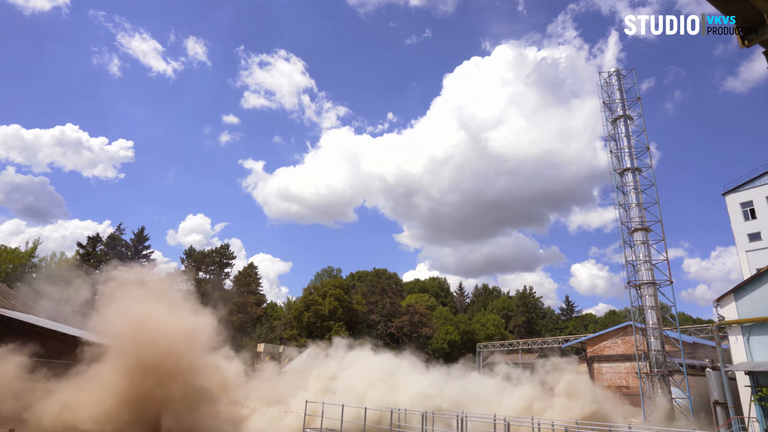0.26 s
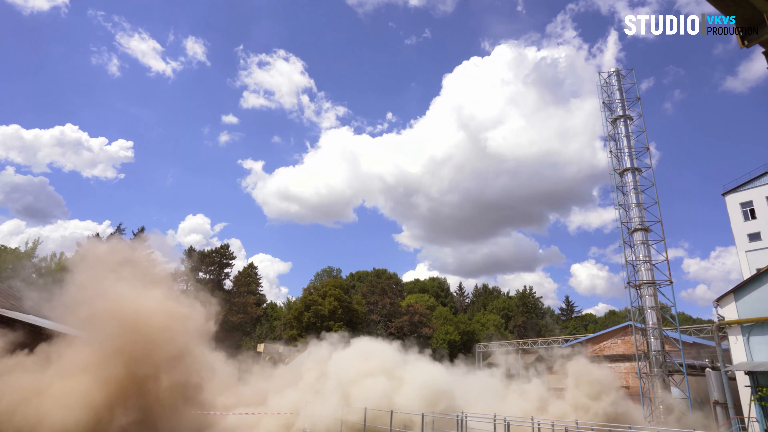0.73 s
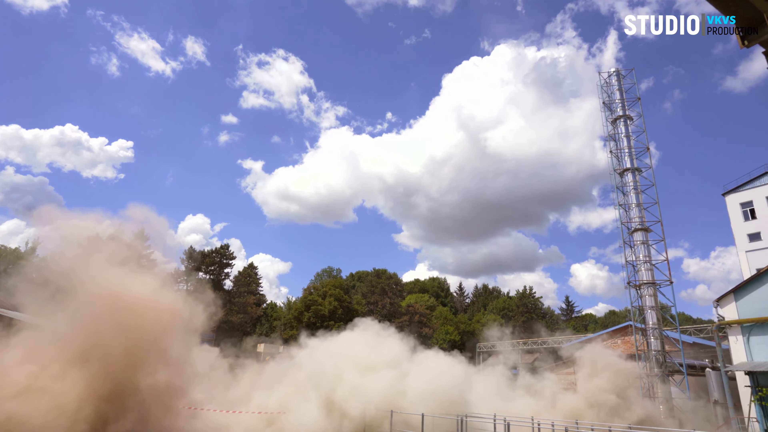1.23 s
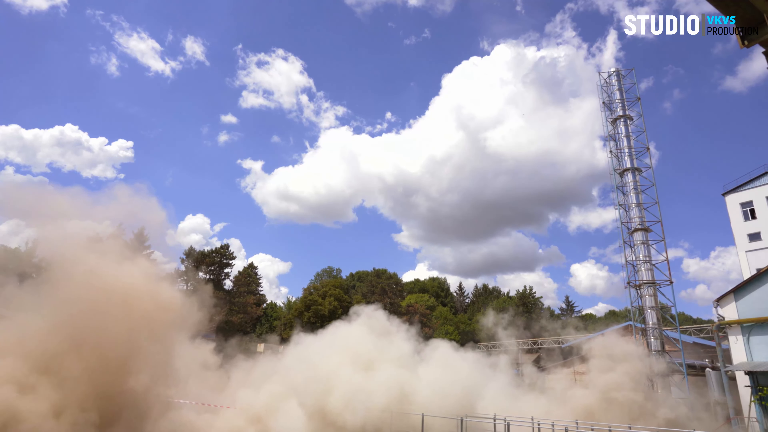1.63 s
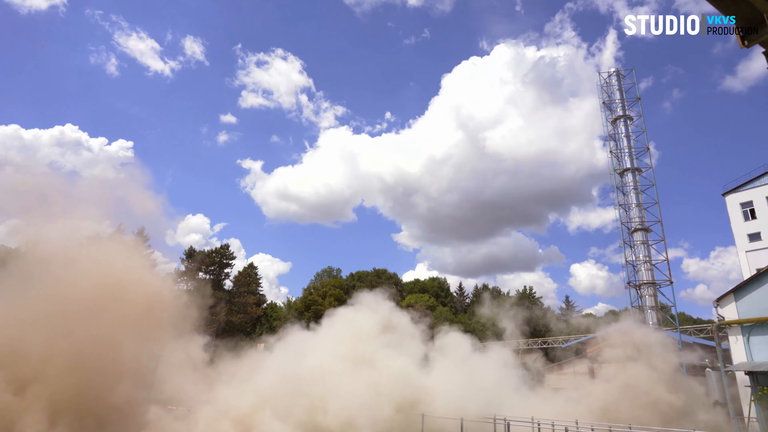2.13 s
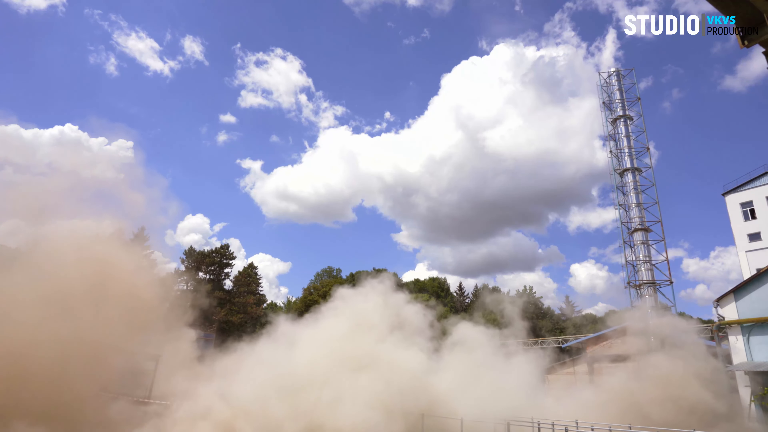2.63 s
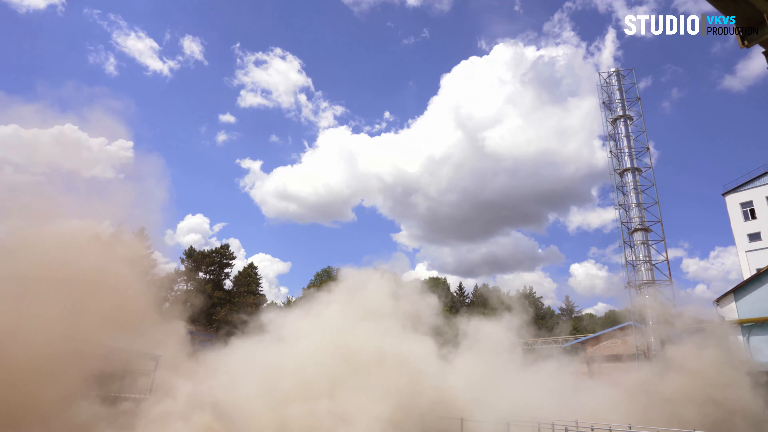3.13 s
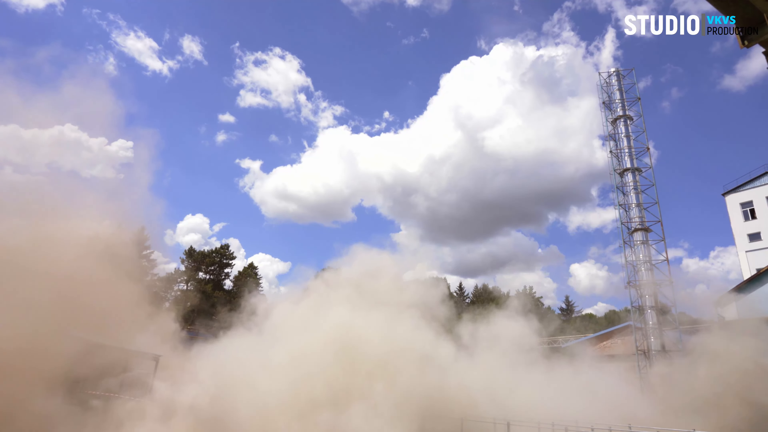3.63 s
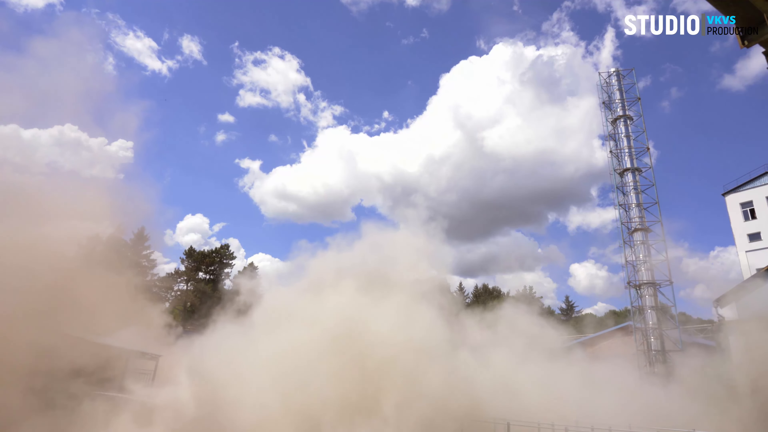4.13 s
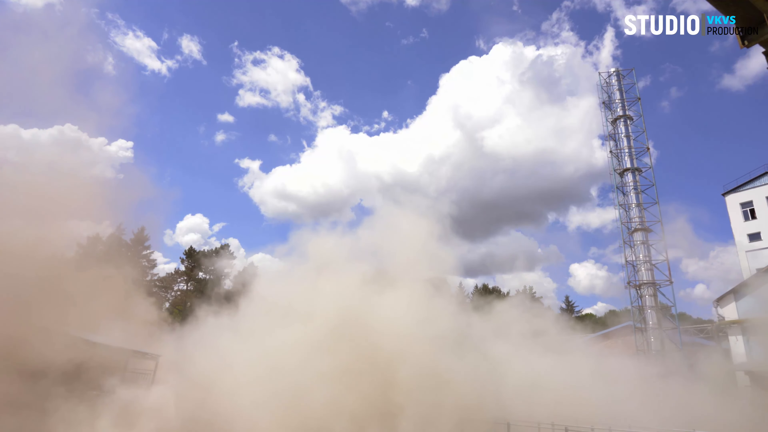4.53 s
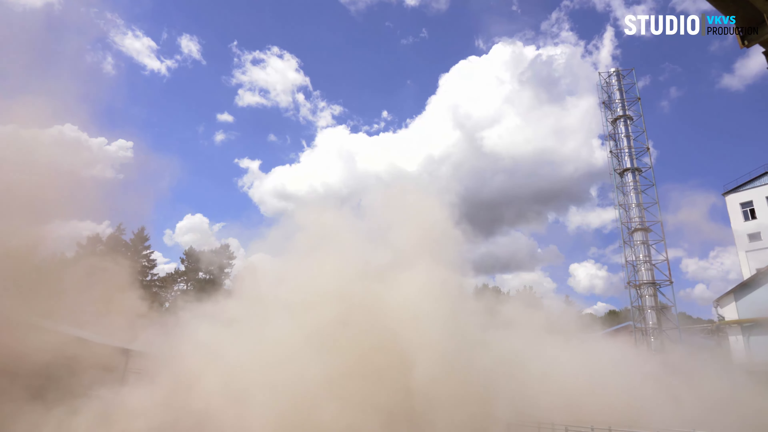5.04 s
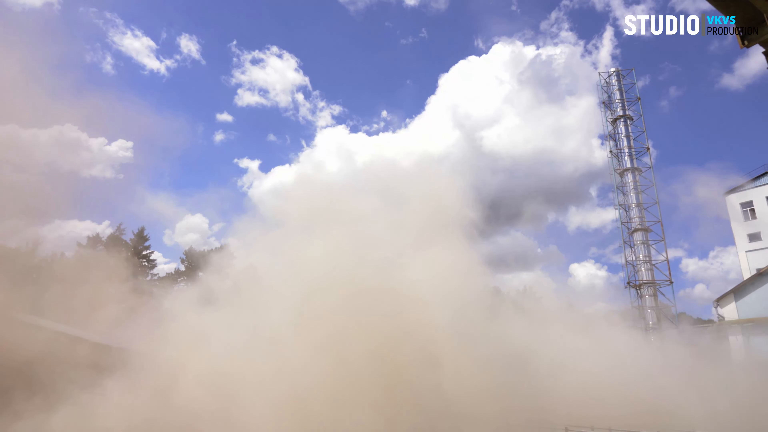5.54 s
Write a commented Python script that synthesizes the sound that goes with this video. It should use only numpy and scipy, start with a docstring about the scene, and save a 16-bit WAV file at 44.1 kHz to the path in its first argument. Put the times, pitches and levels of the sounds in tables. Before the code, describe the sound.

Outdoors beside a collapsed building, masonry falls with a deep rumble, crashing and rattling, uneven at first, then thinning until it stops abruptly at about three seconds. A dull, steady hiss of rolling dust lies beneath and remains, swelling in one throaty gust. Sparse grit ticks close to the microphone, with a few dry clicks and faint low thumps. Mono, no obvious echo, extreme treble missing.

```python
"""Outdoors beside a building that has just come down: masonry keeps falling with a deep rumble that thins and stops short.
The rumble, crash and rattle are random blows mixed with patchy noise in coloured bands; fine debris fizzes on top.
The dust cloud is a dull hiss with a throaty roar and a low roll, lifted by one gust, and it remains after the stop.
Grit ticks near the microphone as short bursts of band noise, among dry clicks and soft low thumps."""
import sys
import numpy as np
from scipy import signal
from scipy.fft import rfft, irfft, next_fast_len
from scipy.io import wavfile
from scipy.ndimage import uniform_filter1d, map_coordinates

SR = 44100
rng = np.random.default_rng(int(sys.argv[2]) if len(sys.argv) > 2 else 0)


def to_wav(s):
    """Save 16-bit WAV."""
    ch = np.atleast_2d(s).T  # columns
    pcm = np.round(np.clip(ch, -1, 1) * 32767)  # PCM
    wavfile.write(sys.argv[1], SR, pcm.astype(np.int16))


def boost_factor(decibels):
    """Convert a level in decibels to a linear amplitude factor."""
    exponent = np.asarray(decibels, float) / 20
    return 10 ** exponent


N = 254456  # length in samples
STOP_S = 3.1128  # the rumble stops short here


def unit(x):
    """Scales x to rms 1."""
    return x / np.sqrt(np.mean(x ** 2) + 1e-20)


def coloured(x, colour):
    """Filters x through a (Hz, dB) spectrum read on log frequency, silent outside it, at rms 1."""
    size = next_fast_len(N + 8192)
    hz, db = np.transpose(colour)
    log_hz = np.log(np.fft.rfftfreq(size, 1 / SR) + 1)
    gain = boost_factor(np.interp(log_hz, np.log(hz + 1), db, left=-120, right=-120))
    return unit(irfft(rfft(x, size) * gain, size)[:N])


def patchy(patchy_db):
    """White noise whose gain varies in random patches of time and frequency, patchy_db being their rms."""
    spectrum = signal.stft(rng.standard_normal(N), nperseg=512)[2]
    field = rng.standard_normal(spectrum.shape)
    field = uniform_filter1d(field, size=6, axis=0)  # across frequency
    field = uniform_filter1d(field, size=12, axis=1)  # across time
    noise = signal.istft(spectrum * boost_factor(patchy_db * unit(field)), nperseg=512)[1]
    return unit(noise[:N])


def impacts(per_s, spread_db):
    """Countless blows at random moments with either sign, a few much harder than the rest."""
    when, size, sign = rng.random((3, N))
    struck = when < per_s / SR
    strength = boost_factor(-spread_db * np.log(size + 1e-9))
    return unit(struck * strength * np.sign(sign - 0.5))


def ramp(start_s, length_s):
    """0 before the start, rising straight to 1."""
    return np.clip((np.arange(N) / SR - start_s) / length_s, 0, 1)


def fading(first_db, loss_db, bend, share):
    """Level of a collapse layer: it sinks ever faster toward the stop and rides a share of the surges."""
    # surges and lulls of the falling masonry: centre_s, change_db (at full share), half_length_s (to 1/e of the change)
    surges = [(0.178, 2.5, 0.11), (0.496, -1.5, .07), (0.985, -1.5, 0.044), (1.066, 4.5, .025),
              (1.132, -5.5, 0.047), (1.204, 2, 0.022), (1.335, 1.5, 0.038), (1.443, -4, 0.076),
              (1.53, 2.5, .04)]
    t = np.arange(N) / SR
    surge_db = sum(db * np.exp(-((t - s) / length) ** 2) for s, db, length in surges)
    sunk_db = loss_db * np.minimum(t / STOP_S, 1) ** bend
    return boost_factor(first_db - sunk_db + share * surge_db)


def spray(blows):
    """Fine debris fizzes faintly; two close inverted echoes with shrinking delays comb it into bands."""
    # colour of the fizz: pitch_hz, level_db
    spray_colour = [(4000, -27), (5500, -1), (7000, -1), (9500, -4), (11700, -8.5), (13200, -13.5),
                    (15700, -20)]
    fizz = coloured(0.2 * blows + patchy(1.2), spray_colour)
    from_s, to_s, shrink_to = 1.3, 1.85, 0.46  # both delays shrink to this fraction
    shrink = 1 - (1 - shrink_to) * ramp(from_s, to_s - from_s)
    echoes = np.zeros(N)
    for first_delay_ms in (0.67, 0.37):
        delay = first_delay_ms * shrink * SR / 1e3  # in samples
        echoes += map_coordinates(fizz, [np.arange(N) - delay], order=3)
    return fading(first_db=-68, loss_db=14.5, bend=2.5, share=0.1) * unit(fizz - 0.19 * echoes)


def collapse():
    """The same blows shake the ground, crash, rattle and spray; patchy noise fills them out into a roar."""
    # colour of the deep ground rumble: pitch_hz, level_db
    shake_colour = [(15, -38), (25, -15), (45, -17), (72, -2), (120, -3), (132, 0.5), (144, 5.5), (157, -8),
                    (175, -4), (260, -40)]
    # colour of the heavy masonry: pitch_hz, level_db
    crash_colour = [(90, -25), (170, -2.5), (290, -2), (460, -3), (560, -10.5), (900, -28.5)]
    # colour of the rattling rubble: pitch_hz, level_db
    rattle_colour = [(330, -43.5), (560, 0.5), (800, -2), (1240, -5.5), (2090, -18), (3020, -30),
                     (4460, -44), (5800, -67)]
    blows = impacts(per_s=900, spread_db=2.5)
    # colour, (first level dB, loss by the stop dB, bend of the fade, share of the surges), blow share, patchy dB
    layers = [(shake_colour, (-26.5, 16.5, 1.66, 0.8), 0.35, 1.2),
              (crash_colour, (-24, 12.5, 2.15, 0.87), 0.3, 0.8),
              (rattle_colour, (-26, 12.5, 1.98, 0.45), 0.25, 0.6)]
    roar = np.zeros(N)
    for colour, fade, blow_share, patchy_db in layers:
        roar += fading(*fade) * coloured(blow_share * blows + patchy(patchy_db), colour)
    cut = 1 - ramp(STOP_S - 0.002, 0.002)  # 2 ms fade into the stop
    return (roar + spray(blows)) * cut


def dust_cloud():
    """Air and dust rush past: a smooth hiss, a throatier roar that swells in the gust, a weak low roll."""
    # colour of the smooth hiss: pitch_hz, level_db
    hiss_colour = [(250, -27), (450, -4.5), (800, -3), (1380, -0.5), (1800, -2.5), (2770, -12), (3600, -21),
                   (4460, -30), (5200, -39), (6000, -49.5), (6800, -59), (8000, -62.5), (11000, -66),
                   (15700, -67.5)]
    # colour of the throaty roar: pitch_hz, level_db
    roar_colour = [(350, -24.5), (520, -5), (700, 1.5), (900, -0.5), (1300, -20)]
    # colour of the low roll: pitch_hz, level_db
    roll_colour = [(15, -44.5), (25, -20), (80, -10), (150, -3.5), (300, -4.5), (420, -4.5), (700, -30)]
    gust_s, rise_s, hold_s, release_s = 3.544, 0.18, 0.16, 0.38
    settle_s, settle_length_s = 4.88, 0.6  # the cloud settles back
    rise = ramp(gust_s, rise_s)
    top = rise - ramp(gust_s + rise_s + hold_s, release_s)
    linger = rise - ramp(settle_s, settle_length_s)
    # colour, level before the gust dB, brief lift dB, lingering lift dB, patchy dB
    layers = [(hiss_colour, -35, 0.4, 1.98, 0.6),
              (roar_colour, -42.5, 4.5, 0.49, 0.64),
              (roll_colour, -45, 1.1, 0.4, 1.3)]
    cloud = np.zeros(N)
    for colour, level_db, top_db, linger_db, patchy_db in layers:
        level = boost_factor(level_db + top_db * top + linger_db * linger)
        cloud += level * coloured(patchy(patchy_db), colour)
    return cloud


def add(track, s, sound):
    """Mixes a short sound into the track at s seconds."""
    start = round(s * SR)
    track[start:start + len(sound)] += sound[:max(N - start, 0)]


def grit():
    """Grains ring for a few ms around their pitch; clicks are dry spikes; thumps are short low pushes."""
    # grit ticks: start_s, level_db (of the noise before its band is cut out), pitch_hz
    ticks = [(.7264, -58, 14200), (1.3654, -62, 14600), (1.4999, -44, 6500), (1.542, -38, 7000),
             (1.8033, -55.5, 8000), (1.991, -40, 8500), (2.5094, -50.5, 6500), (2.5813, -47, 7500),
             (3.5206, -60, 8460), (3.5393, -52, 8500), (3.9487, -60, 8000), (5.258, -58.5, 6500),
             (5.277, -55.5, 10500), (5.2954, -49.5, 7000)]
    # dry wideband clicks: start_s, peak_db
    clicks = [(1.0947, -43), (3.1128, -44), (3.5988, -33)]
    # soft low thumps: start_s, level_db (before the soft onset and decay), pitch_hz
    thumps = [(4.509, -33, 161.6), (4.6, -41, 76), (5.275, -35.5, 60.3)]
    track = np.zeros(N)
    t = np.arange(SR // 5) / SR

    # ten fainter grains land at random while masonry falls, -59 dB give or take 3 dB, 9 to 15 kHz
    when, size, pitch = rng.random((10, 3)).T
    faint = zip(when * STOP_S, -59 + 3 * (2 * size - 1), 9000 + 6000 * pitch)
    for s, db, hz in [*ticks, *faint]:
        band = signal.butter(2, [0.54 * hz, min(1.14 * hz, 0.45 * SR)], "band", fs=SR)
        scratch = signal.lfilter(*band, rng.standard_normal(len(t)))
        add(track, s, boost_factor(db - 60 * t / 0.005) * scratch)  # falls 60 dB in 5 ms

    for s, db in clicks:
        add(track, s, boost_factor(db) * np.array([0.3, 1, 0.3]))

    for s, db, hz in thumps:
        decay = boost_factor(db - 60 * t / 0.19)  # falls 60 dB in 190 ms
        onset = 1 - np.exp(-t / 0.0046)
        add(track, s, decay * onset * np.sin(2 * np.pi * hz * t))
    return track


def scene():
    """Collapse, cloud and grit together, in mono."""
    return (collapse() + dust_cloud() + grit())[None]


def top_cut(x):
    """Nothing passes above the cut-off."""
    return signal.sosfilt(signal.butter(12, 15750, fs=SR, output="sos"), x)


def record(dry):
    """Passes on the finished mix."""
    return top_cut(dry)


dry = scene()
out = record(dry)
to_wav(out)
```